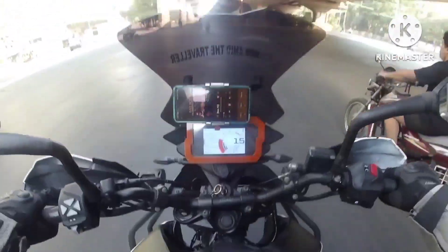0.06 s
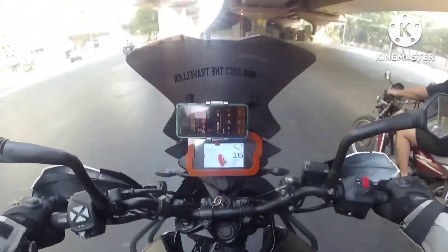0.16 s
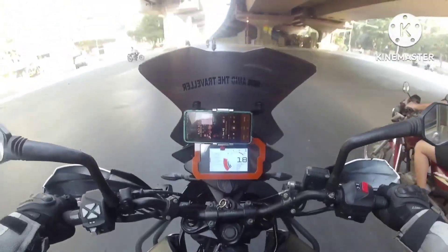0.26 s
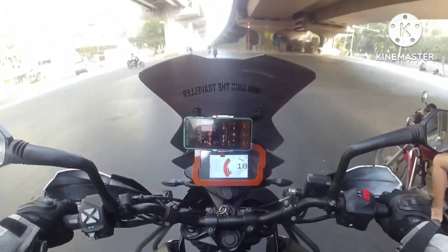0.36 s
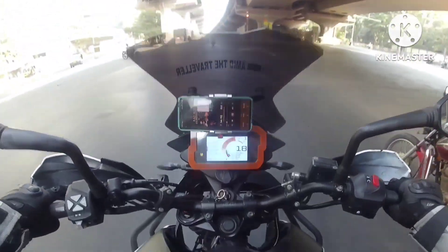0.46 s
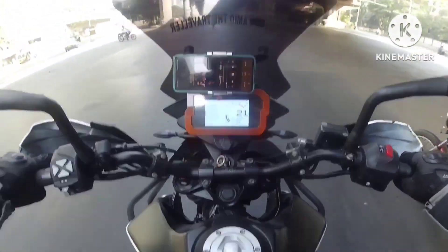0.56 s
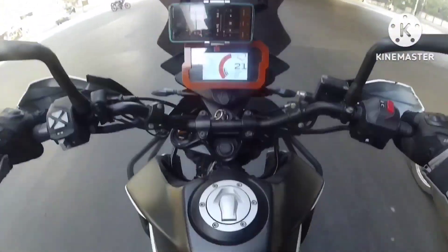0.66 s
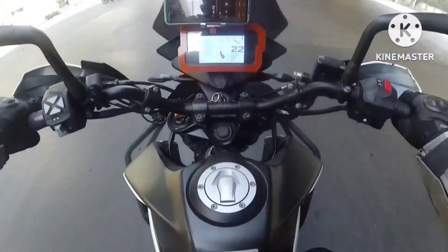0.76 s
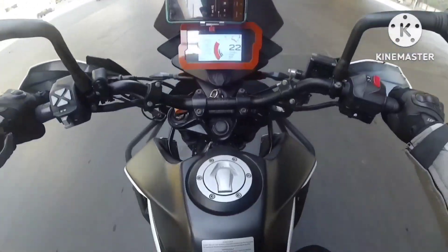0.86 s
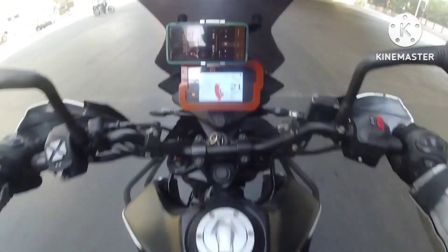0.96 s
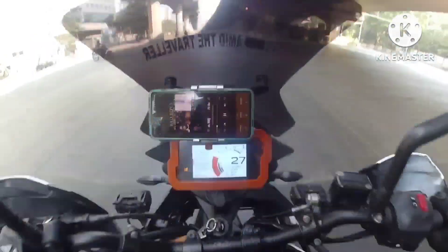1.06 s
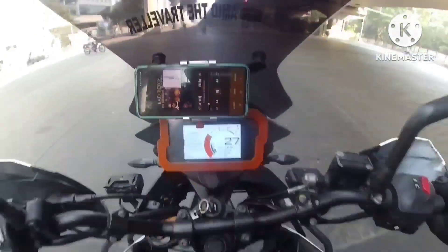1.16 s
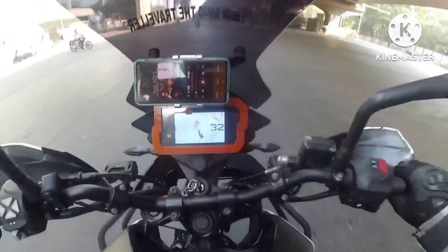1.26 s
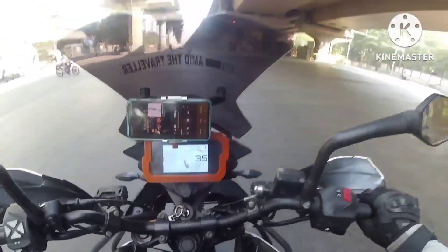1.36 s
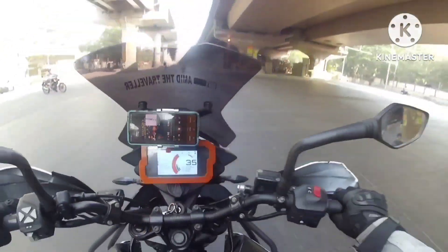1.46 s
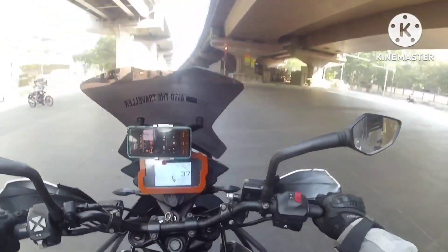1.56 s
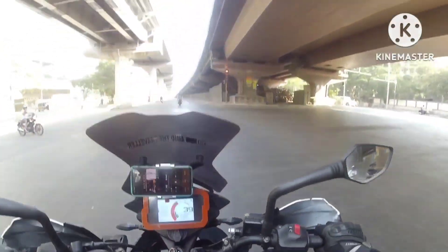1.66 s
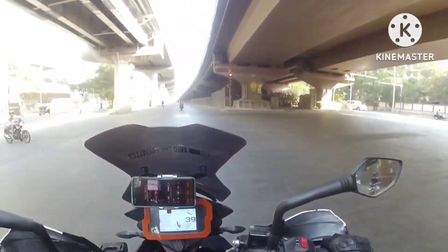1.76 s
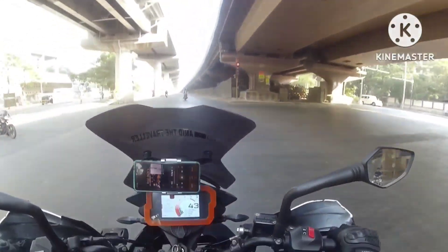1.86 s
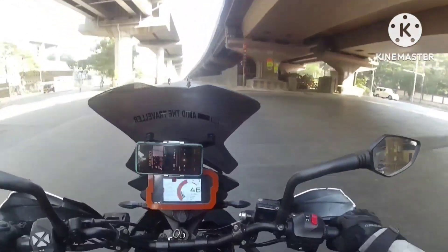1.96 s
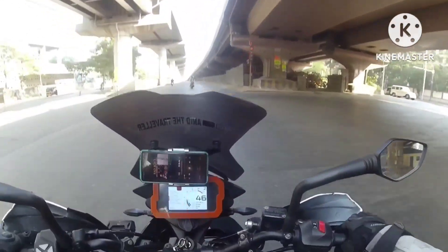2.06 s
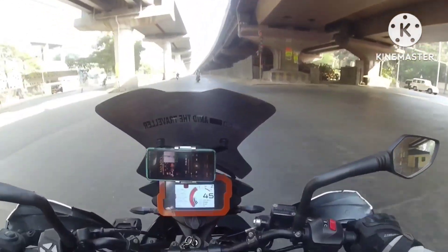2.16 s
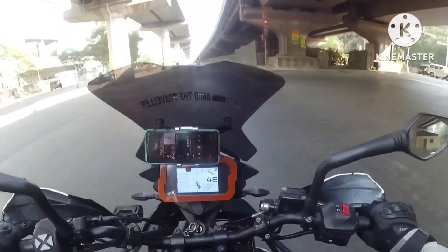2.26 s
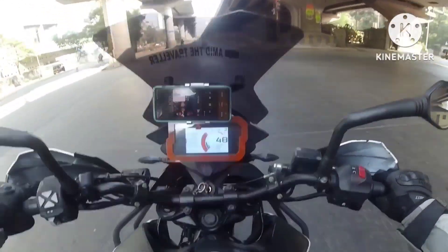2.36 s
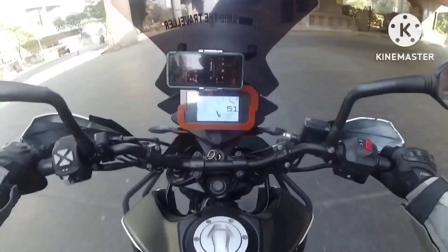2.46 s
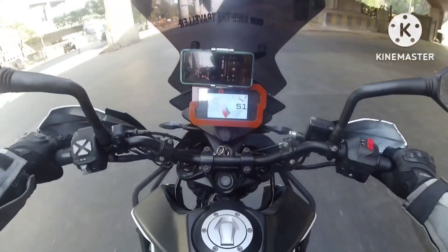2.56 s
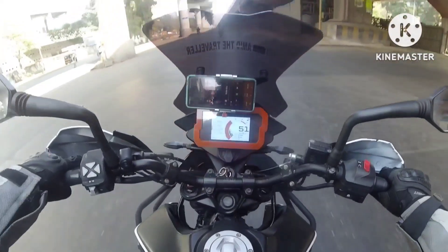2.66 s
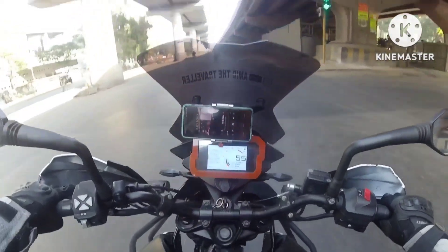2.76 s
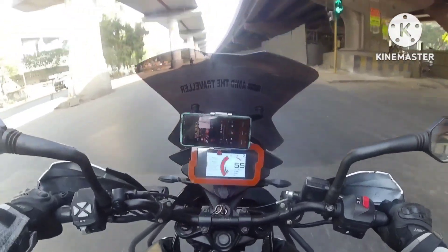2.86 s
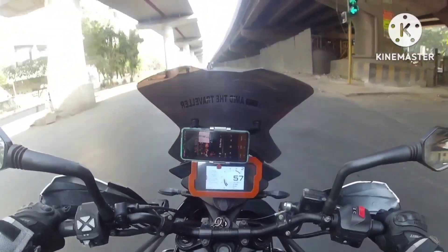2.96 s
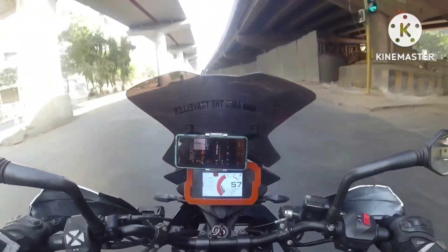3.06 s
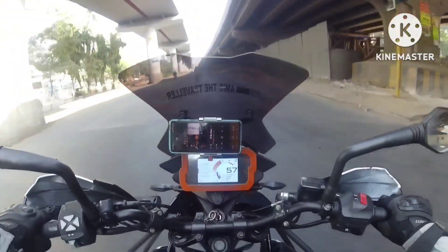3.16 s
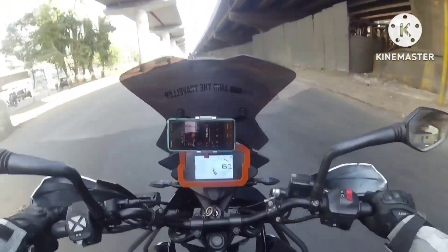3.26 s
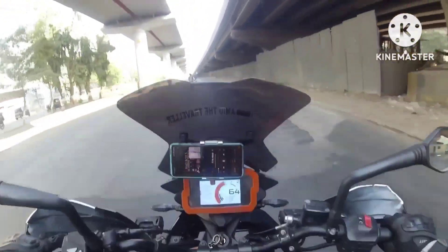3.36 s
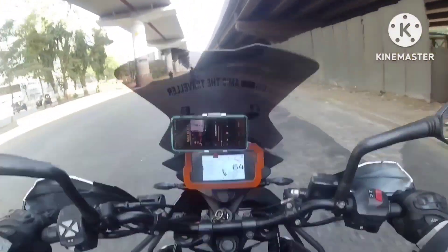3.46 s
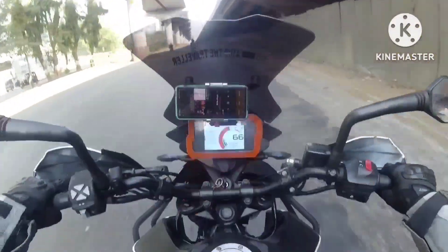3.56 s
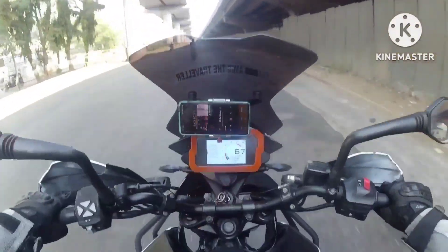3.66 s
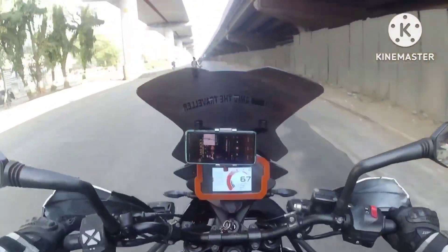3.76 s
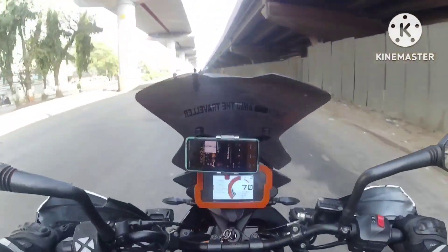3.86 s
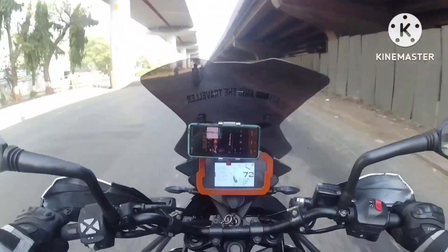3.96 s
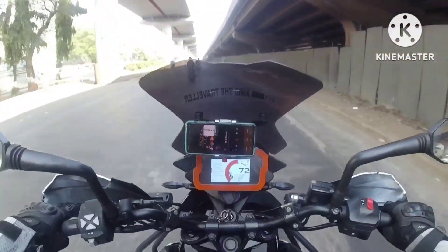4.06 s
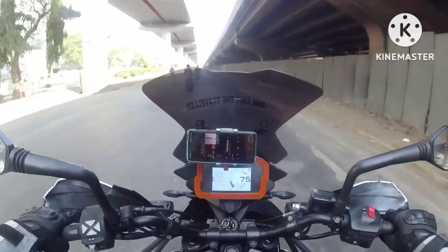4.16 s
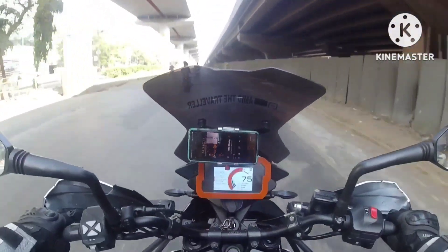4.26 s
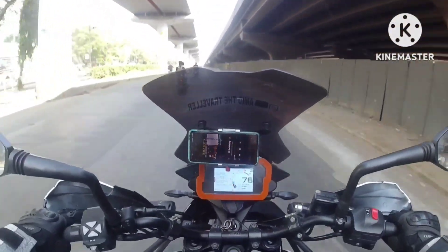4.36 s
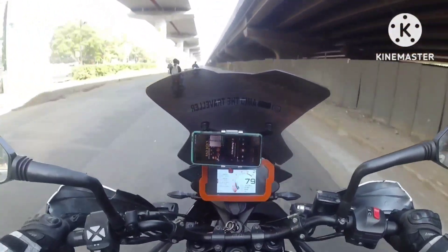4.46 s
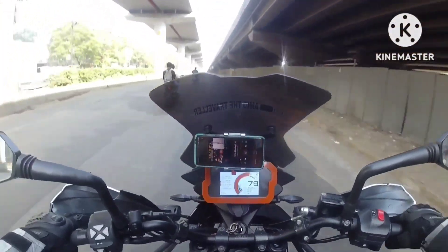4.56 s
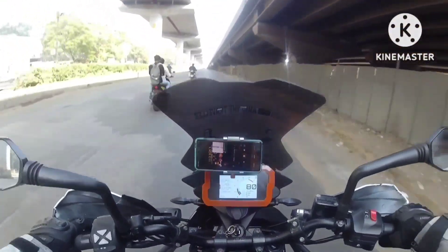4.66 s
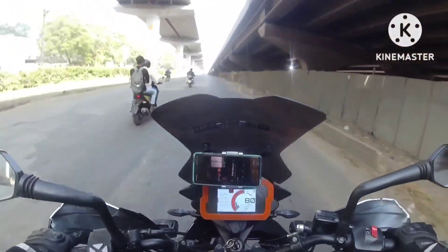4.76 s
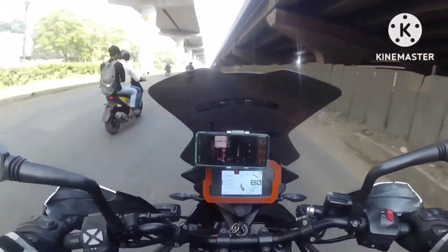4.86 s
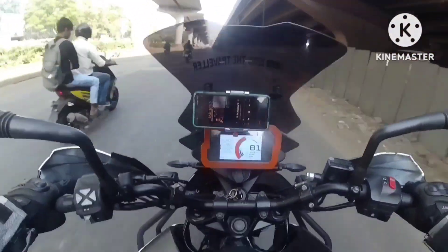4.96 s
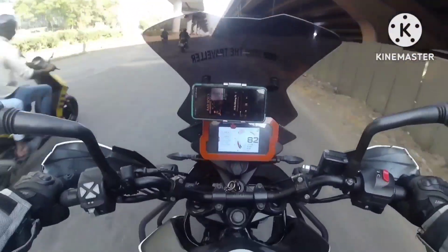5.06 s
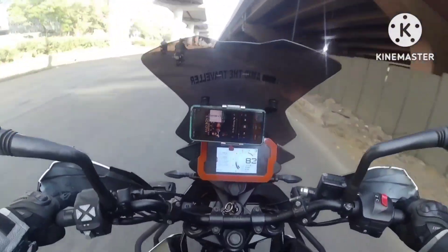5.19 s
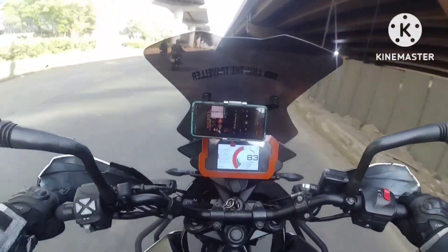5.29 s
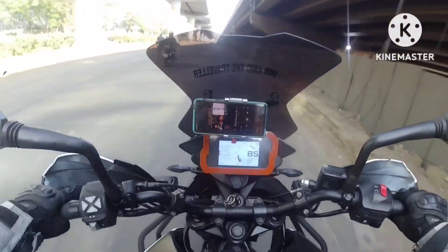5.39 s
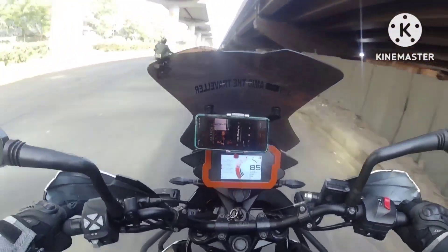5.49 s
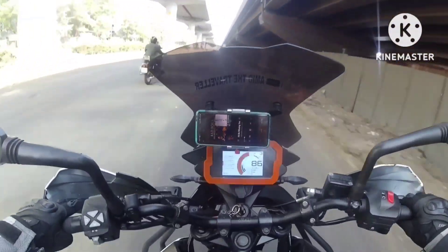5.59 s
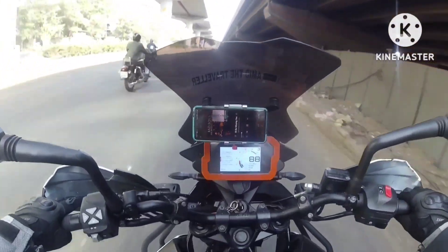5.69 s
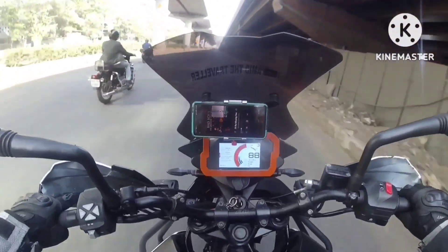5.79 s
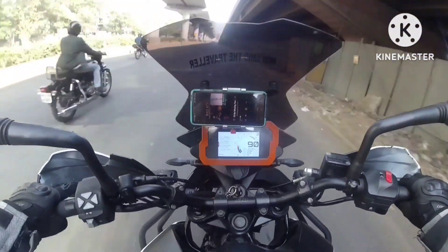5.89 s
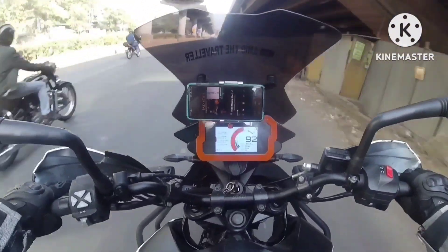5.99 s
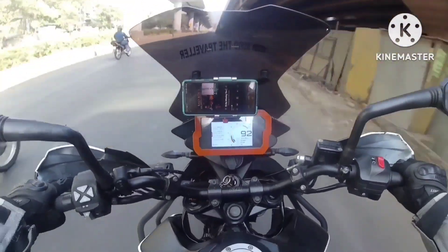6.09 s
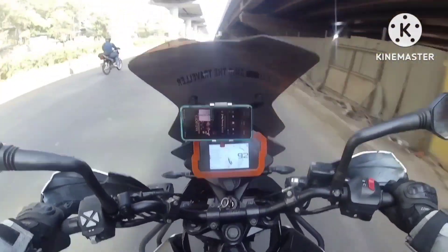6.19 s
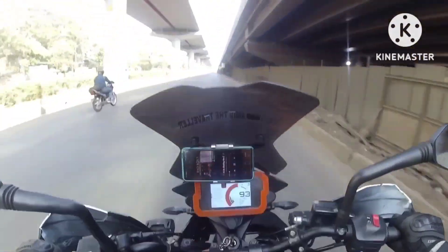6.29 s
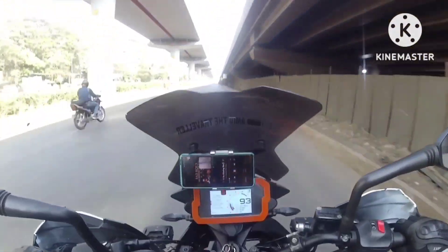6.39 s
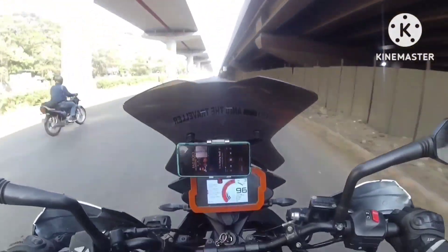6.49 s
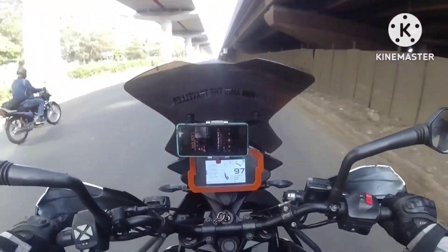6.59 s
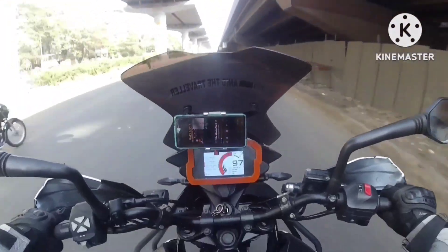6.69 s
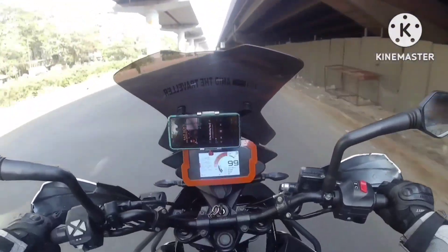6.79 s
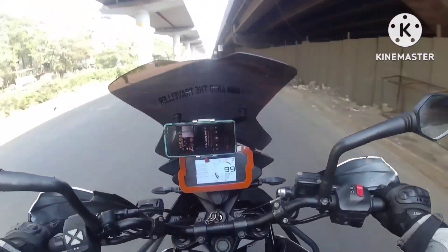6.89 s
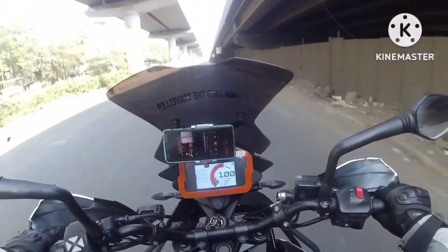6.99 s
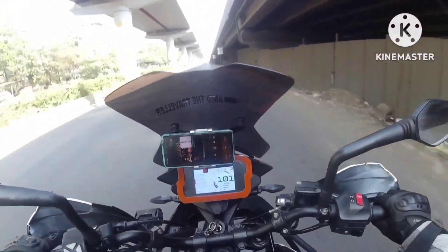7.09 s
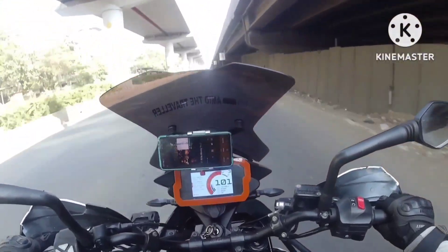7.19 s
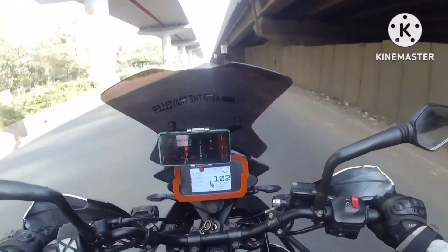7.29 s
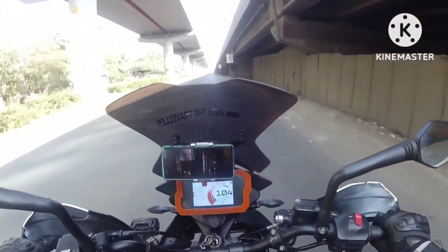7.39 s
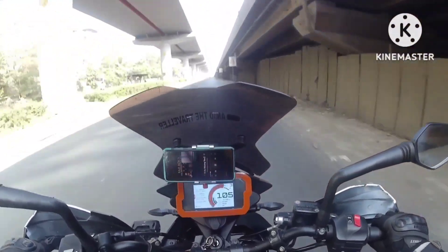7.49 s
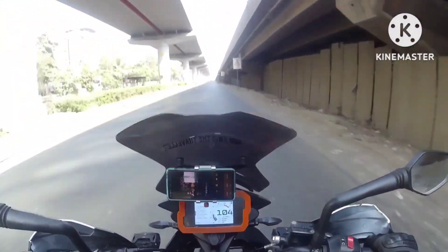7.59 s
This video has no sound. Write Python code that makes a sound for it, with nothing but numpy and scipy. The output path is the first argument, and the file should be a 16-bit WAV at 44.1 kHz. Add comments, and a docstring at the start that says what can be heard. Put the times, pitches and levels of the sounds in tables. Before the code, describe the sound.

From the rider's seat, a thumping motorbike engine revs, pulls away and climbs in pitch, increasingly chopped by distorted wind buffeting.

```python
"""The rider's seat of a single-cylinder motorcycle: a blip of the throttle, a gear clunking in as the
engine pulls away, then a hard run up through the gears. The exhaust is a stack of engine orders, the
clatter a knock pattern repeated each cycle, the clunk a crack with ringing metal. The airstream's eddies
grow with speed until they overload the microphone and chop the engine into crackling bursts."""
import sys
import numpy as np
from scipy import signal
from scipy.fft import rfft, irfft, next_fast_len
from scipy.io import wavfile
from scipy.ndimage import uniform_filter1d

SR = 44100
rng = np.random.default_rng(int(sys.argv[2]) if len(sys.argv) > 2 else 0)


def unload_audio(sound):
    """Save the sound as a 16-bit wav file, at the path given as the first command line argument."""
    columns = np.transpose(np.atleast_2d(sound))
    # keep every value between -1 and 1, then stretch to whole-number steps
    steps = np.round(np.clip(columns, -1, 1) * 32767)
    wavfile.write(sys.argv[1], SR, steps.astype(np.int16))


N = 336703
TIME = np.arange(N) / SR

# relative spectrum of the engine case, for clatter and clunk: freq_hz, density_db (dB per Hz)
CASE_SPECTRUM = [(100, -43), (350, 5), (600, -2), (850, -4.5), (1150, 0), (1500, -4.5), (2200, 3),
                 (2850, -5), (3600, -4), (4200, -5.5), (5000, -15.5), (6000, -20), (7500, -21.5),
                 (10500, -17), (11600, -22.5), (13000, -13.5), (14500, -18)]


def from_db(db):
    """Decibels to gain."""
    return 10 ** (np.asarray(db) / 20)


def rms_one(x):
    """Scale to unit rms."""
    return x / np.sqrt(np.mean(x ** 2) + 1e-20)


def in_time(rows):
    """Each column of a breakpoint curve, read at every sample."""
    s, *columns = np.transpose(rows)
    return [np.interp(TIME, s, c) for c in columns]


def at_hz(points, hz):
    """Read a spectrum on a log-frequency axis."""
    f, level = np.transpose(points)
    return np.interp(np.log(hz), np.log(f), level)


def ease(x, seconds):
    """Round the corners of a control with a moving average."""
    return uniform_filter1d(x, size=max(int(seconds * SR), 1), mode="nearest")


def bump(s, half_s):
    """A smooth rise and fall of height 1, down to 1/e at half_s from the middle."""
    return np.exp(-np.square((TIME - s) / half_s))


def drift(rate_hz):
    """Slow random wander of unit rms: coarse noise twice through a one-pole low-pass."""
    step = 40   # samples between noise points
    settle = 2000   # noise points dropped while the filter settles
    r = np.exp(-2 * np.pi * rate_hz * step / SR)
    noise = rng.standard_normal(N // step + settle + 2)
    slow = signal.lfilter([1], [1, -2 * r, r * r], noise)[settle:]
    return np.interp(np.arange(N) / step, np.arange(len(slow)), rms_one(slow))


def colour(x, spectrum):
    """Give a sound the tilt of a spectrum; unit rms."""
    size = next_fast_len(N)
    hz = np.maximum(np.fft.rfftfreq(size, 1 / SR), 1)
    shaped = rfft(x, size) * from_db(at_hz(spectrum, hz))
    return rms_one(irfft(shaped, size)[:N])


def resonate(x, hz, width_hz):
    """A two-pole resonance with unit gain on top."""
    r = np.exp(-np.pi * width_hz / SR)
    feed = np.array([1, 0, -1]) * (1 - r * r) / 2
    return signal.lfilter(feed, [1, -2 * r * np.cos(2 * np.pi * hz / SR), r * r], x)


def ring(clicks, hz, t60_s):
    """A unit click sets off a decaying sine that starts at height 1."""
    r = np.exp(-np.log(1000) / (t60_s * SR))
    w = 2 * np.pi * hz / SR
    # the tiny constant keeps the filter out of denormal numbers
    return signal.lfilter([0, np.sin(w)], [1, -2 * r * np.cos(w), r * r], clicks + 1e-18)


def engine(unsteady=0.00302):
    """Exhaust and clatter grow with engine speed; orders boom as they pass the silencer's resonance."""
    # level of an order sweeping through the silencer's resonance: freq_hz, level_db
    boom_curve = [(135, -43), (170, -29), (195, -20), (220, -15), (240, -9), (272, -6.5), (291, -9),
                  (303, -17), (320, -31)]
    # clutch pulled at gear changes, exhaust dips and gearbox and chain may rattle up:
    # middle_s, half_length_s, exhaust_db, clatter_db
    shifts = [(2.385, 0.17, -1.5, 0), (4.467, 0.27, -6.5, 5.5)]
    cruise_hz = 66   # firing rate at which the base levels hold
    exhaust_db, exhaust_db_per_octave = -14, 7.5
    clatter_db, clatter_db_per_octave = -26, 13
    fifth_db = -18   # the fifth order excites the resonance more weakly, and more strongly under load

    firing_hz, load_db = throttle()
    octaves = np.log2(firing_hz / cruise_hz)
    cycles = np.cumsum(firing_hz * (1 + unsteady * drift(19.53))) / SR
    dip_db = sum(db * bump(s, half_s) for s, half_s, db, _ in shifts)
    rattle_db = sum(db * bump(s, half_s) for s, half_s, _, db in shifts)

    exhaust_gain = from_db(exhaust_db + exhaust_db_per_octave * octaves + load_db)
    fourth_gain = from_db(at_hz(boom_curve, 4 * firing_hz))
    fifth_gain = from_db(at_hz(boom_curve, 5 * firing_hz) + fifth_db + load_db)
    pipe = exhaust_gain * exhaust(firing_hz, cycles)
    pipe += fourth_gain * boom(cycles, order=4)
    pipe += fifth_gain * boom(cycles, order=5)

    clatter_gain = from_db(clatter_db + clatter_db_per_octave * octaves + rattle_db)
    return from_db(dip_db) * pipe + clatter_gain * clatter(cycles)


def throttle():
    """Firing rate and load: the engine climbs on open throttle and sinks evenly until the next pull."""
    # a blip, then the pulls through the gears; one firing every second turn of the crank:
    # open_s, shut_s, open_firing_hz, shut_firing_hz, climb_bend (exponent, 1 = even), load_db
    pulls = [(.32, 0.557, 33, 80.5, 1.07, 3), (.99, 2.059, 37.4, 69.3, .83, 4),
             (2.399, 4.1, 51, 76.3, 1.08, 1), (4.5, 7.63, 59.8, 79.6, 0.95, 1)]
    # the engine running down to idle at first: time_s, firing_hz
    run_down = [(0, 48.5), (.2, 33.8)]
    flywheel_s = .07   # the flywheel rounds every change of speed
    throttle_s = 0.34   # time the load takes to build and to go

    corners = []
    for start, end, low, high, _, _ in pulls:
        corners += [(start, low), (end, high)]
    firing_hz = in_time(list(run_down) + corners)[0]
    load_db = np.zeros(N)
    for start, end, low, high, bend, db in pulls:
        pulling = (TIME >= start) & (TIME < end)
        progress = (TIME[pulling] - start) / (end - start)
        firing_hz[pulling] = low + (high - low) * progress ** bend
        load_db[pulling] = db
    return ease(firing_hz, flywheel_s), ease(load_db, throttle_s)


def exhaust(firing_hz, cycles, count=22, flutter_db=4.5, mellow_db_per_hz=0.1, full_hz=76):
    """Firing pulses as a levelled stack of orders shaped by the silencer, no two bangs alike."""
    # silencer response, relative between orders: freq_hz, level_db
    silencer = [(30, 6), (55, 2.5), (80, 3.5), (105, 3), (140, -13), (175, -9), (235, -6.5), (280, -4),
                (345, -6.5), (450, -15.5), (630, -18.5), (760, -25), (1030, -22), (1400, -34.5)]
    out = np.zeros(N)
    mellow_db = mellow_db_per_hz * np.maximum(full_hz - firing_hz, 0)   # slow firing has softer edges
    for k in range(1, count + 1):
        level_db = at_hz(silencer, k * firing_hz) + flutter_db * drift(10) - mellow_db * (k > 7)
        lag = np.pi * k * k / 4   # the pipe spreads each bang over the whole cycle
        out += from_db(level_db) * np.cos(2 * np.pi * k * cycles - lag)
    return out / np.sqrt(uniform_filter1d(out ** 2, size=4410))   # hold the 0.1 s running rms at 1


def boom(cycles, order=4, uneven_db=2.5):
    """One engine order as a sine for the silencer's resonance, its level wandering a little."""
    return np.sqrt(2) * np.cos(2 * np.pi * order * cycles) * from_db(uneven_db * drift(17.3))


def clatter(cycles, size=512, repeating=0.71, throb=0.079, shake=0.25):
    """Valves, piston and chain repeat one pattern of knocks each engine cycle, over a loose rattle."""
    # panels and brackets that buzz along for a while, level relative to the case noise:
    # start_s, end_s, freq_hz, width_hz, level_db
    buzzes = [(.53, .64, 627, 20, -5), (.53, .61, 1020, 30, -4), (.5, .72, 1810, 70, -7),
              (.5, .87, 3650, 350, -8), (0, 4.0, 1790, 110, -13), (1.13, 1.7, 2330, 320, -6),
              (0, 2.95, 1130, 130, -8), (2.2, 3.0, 3350, 200, -7), (4.5, 7.0, 4050, 400, -10)]
    pattern = np.interp(cycles % 1, np.arange(size) / size, rng.standard_normal(size), period=1)
    knocks = repeating * rms_one(pattern) + rng.standard_normal(N)
    beat = np.cos(2 * np.pi * cycles)
    case = colour(knocks * (1 + throb * beat), CASE_SPECTRUM)
    shaking = knocks * (1 + shake * beat)
    for start, end, hz, width_hz, db in buzzes:
        active = np.clip(np.minimum(TIME - start, end - TIME) / .04 + .5, 0, 1)   # 40 ms fades
        case = case + from_db(db) * active * rms_one(resonate(shaking, hz, width_hz))
    return case


def gear_clunk(crack_s=0.00054):
    """The dogs hit and bounce: a short crack through the case and the ring of the gearbox."""
    # gear dogs engaging, levels relative within the clunk: time_s, level_db
    dog_hits = [(1.1695, -9), (1.1775, -16)]
    # gearbox ringing, level relative to the hit: freq_hz, level_db, t60_s
    gearbox_modes = [(382, 15.5, 0.0078), (557, 11, 0.013), (770, -2, 0.022), (1520, 1.5, 0.017),
                     (1670, -3, 0.016), (2570, -2.5, .02), (3730, -3.5, 0.0071)]
    clicks, crack = np.zeros(N), np.zeros(N)
    for s, db in dog_hits:
        clicks[round(s * SR)] = from_db(db)
        crack += from_db(db) * (TIME >= s) * np.exp(-np.abs(TIME - s) / crack_s)
    rings = np.zeros(N)
    for k, (hz, db, t60_s) in enumerate(gearbox_modes):
        rings += (-1) ** k * from_db(db) * ring(clicks, hz, t60_s)   # alternating polarity
    return rings + crack * colour(rng.standard_normal(N), CASE_SPECTRUM)


def wind(wander=.34, swell_db=3.0, gust_push=5.0):
    """Near-regular eddies over broad turbulence grow with road speed; gusts override them with a push."""
    # road speed: time_s, speed_kmh
    road_speed = [(0, 13.6), (1, 23.8), (2, 45), (2.5, 49.5), (4, 72), (5, 79.7), (7.63, 94.2)]
    # the eddies swell and slacken: middle_s, half_length_s, level_db
    swells = [(1.053, 0.038, 9.5), (1.9, 0.036, 7.5), (2.049, .1, -8), (2.38, 0.096, 3.5), (2.68, .04, -13),
              (3.131, 0.081, 3.5), (3.5, 0.048, 12), (4.201, 0.23, 7), (4.53, .1, 7), (4.878, 0.19, 10.5),
              (5.679, 0.051, 3), (6.63, 0.086, 3)]
    # gusts that pin the diaphragm: middle_s, length_s, sign (push +1, suction -1)
    gusts = [(2.173, 0.024, 1), (2.201, 0.022, -1), (2.331, 0.022, 1), (2.357, 0.028, -1),
             (3.098, 0.025, -1), (3.268, 0.021, 1), (3.367, 0.022, -1), (3.483, 0.033, -1),
             (3.534, 0.038, -1), (3.949, 0.028, -1), (4.079, 0.033, 1), (4.257, 0.04, -1),
             (4.487, 0.024, 1), (4.661, 0.031, -1), (4.855, 0.037, -1), (4.967, 0.025, -1),
             (5.012, 0.036, -1), (5.643, 0.021, -1), (5.683, 0.025, -1), (6.479, 0.023, -1),
             (6.569, 0.022, 1), (6.669, 0.027, -1), (6.899, 0.026, -1), (7.201, 0.02, 1), (7.253, 0.024, 1)]
    # relative spectrum of turbulence at the microphone: freq_hz, density_db (dB per Hz)
    turbulence_spectrum = [(12, -5), (30, -5.5), (60, -3), (125, -9.5), (200, -15), (400, -24),
                           (800, -34.5), (1600, -41.5), (4000, -64.5)]
    fast_kmh = 80   # road speed at which the wind and turbulence levels hold
    wind_db, wind_db_per_octave = 1, 8
    eddy_hz, eddy_hz_per_kmh = 13, .14   # eddy rate at standstill and its growth
    fine_db, fine_db_per_kmh = -2.5, 0.15   # fine turbulence beside the eddies
    swell_roughens = .25   # share of a swell's dB that reaches the fine turbulence

    kmh, = in_time(road_speed)
    surge_db = sum(db * bump(s, half_s) for s, half_s, db in swells)
    turns = np.cumsum((eddy_hz + eddy_hz_per_kmh * kmh) * np.exp(wander * drift(10))) / SR
    eddy_gain = from_db(surge_db + swell_db * drift(9.9))
    eddies = np.sqrt(2) * np.sin(2 * np.pi * turns) * eddy_gain
    turbulence_db = fine_db + fine_db_per_kmh * (kmh - fast_kmh) + swell_roughens * surge_db
    turbulence = colour(rng.standard_normal(N), turbulence_spectrum)
    pressure = eddies + from_db(turbulence_db) * turbulence
    for s, length_s, sign in gusts:
        age = (TIME - s) / length_s
        share = np.exp(-(age / .8) ** 4)   # how far the gust replaces the rest
        # the pressure swings back on either side
        push = sign * gust_push * from_db(surge_db) * np.cos(np.pi * age)
        pressure = pressure + share * (push - pressure)
    return from_db(wind_db + wind_db_per_octave * np.log2(kmh / fast_kmh)) * pressure


def scene():
    """Engine, gear clunk and airstream add up at the microphone."""
    clunk_db = -1.5
    return (engine() + from_db(clunk_db) * gear_clunk() + wind())[None]


def record(dry, offset=-0.0085):
    """The overloaded input flattens against its rails, smothering all else; then the top is cut."""
    rail, knee, hiss_db = .86, 5, -72   # a higher knee bends more sharply
    cutoff_hz = 15550
    clipped = dry / (1 + np.abs(dry / rail) ** knee) ** (1 / knee) + offset
    hiss = from_db(hiss_db) * rng.standard_normal(N)
    low_pass = signal.ellip(10, .1, 80, cutoff_hz, fs=SR, output="sos")
    return signal.sosfilt(low_pass, clipped + hiss)


dry = scene()
out = record(dry)
unload_audio(out)
```